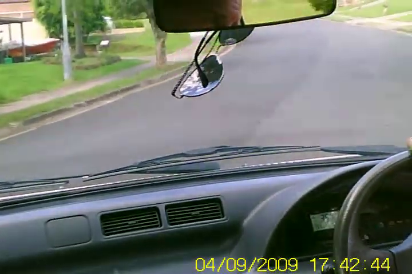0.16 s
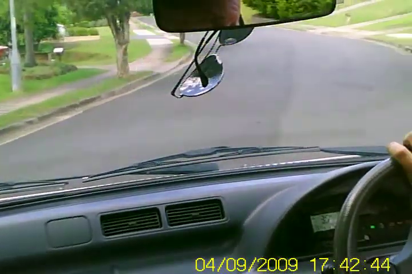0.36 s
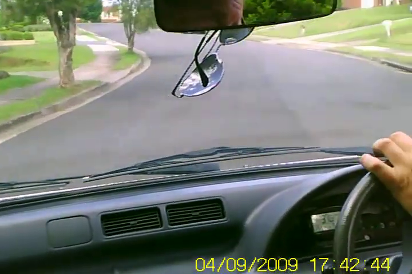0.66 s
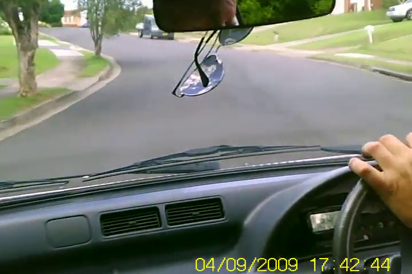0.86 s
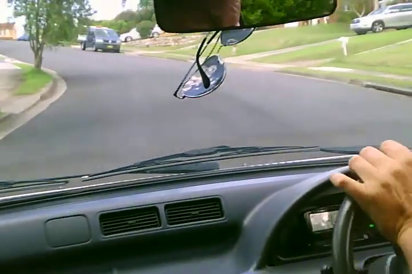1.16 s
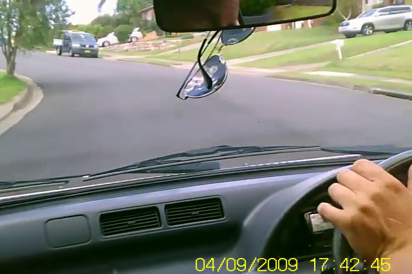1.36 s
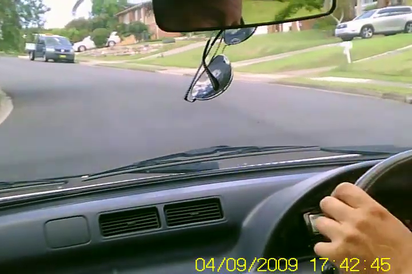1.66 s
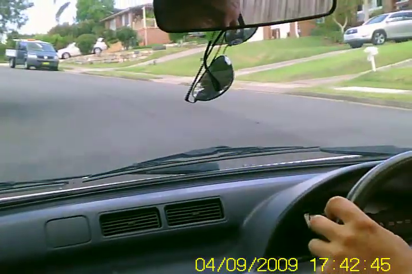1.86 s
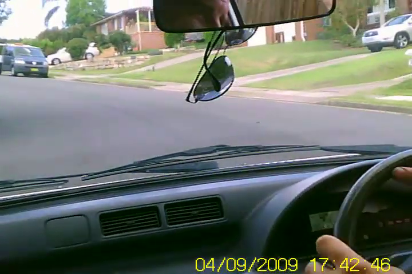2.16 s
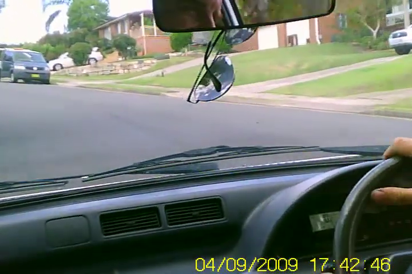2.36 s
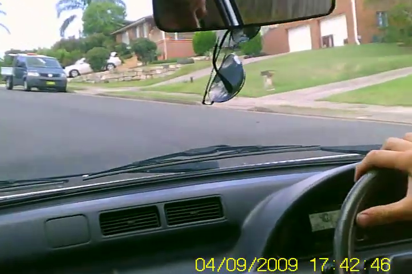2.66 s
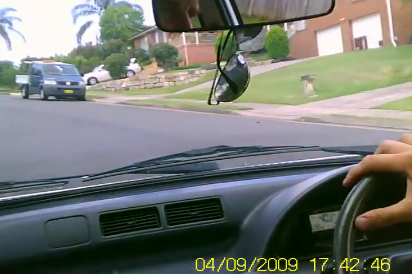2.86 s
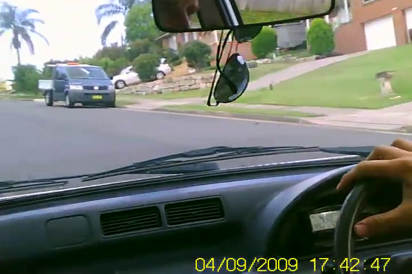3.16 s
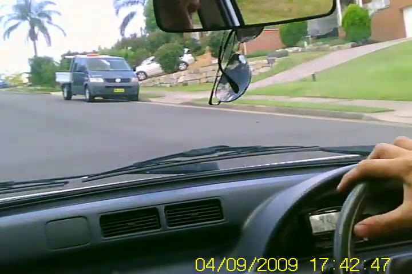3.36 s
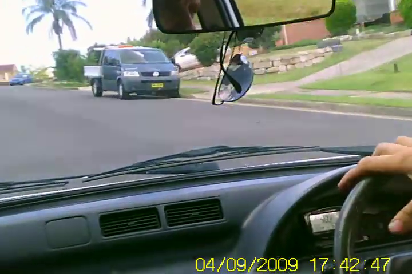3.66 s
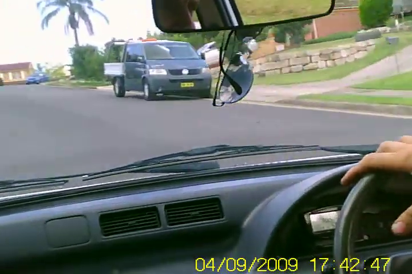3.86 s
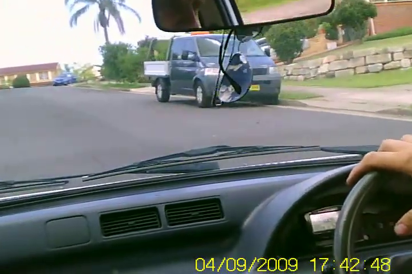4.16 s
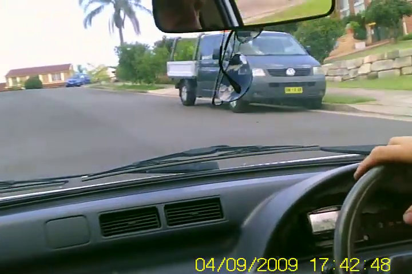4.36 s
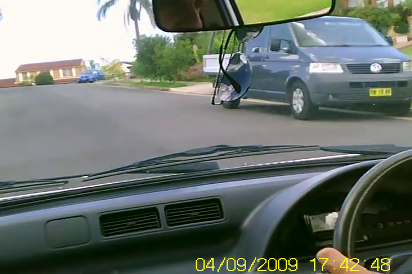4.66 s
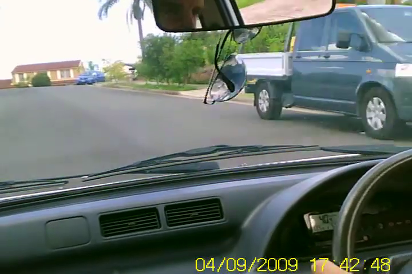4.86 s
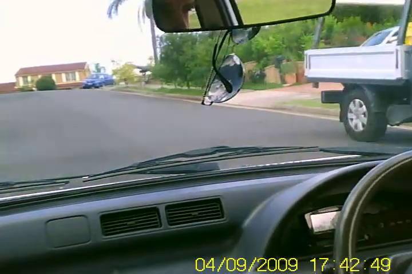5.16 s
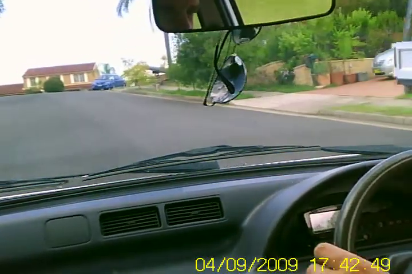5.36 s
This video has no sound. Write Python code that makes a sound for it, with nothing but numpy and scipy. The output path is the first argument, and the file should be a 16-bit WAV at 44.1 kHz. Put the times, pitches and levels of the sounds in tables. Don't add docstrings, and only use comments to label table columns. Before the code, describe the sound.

Inside a small electric car, a thin high motor whine rides over deep road rumble, with a few soft bumps and trim ticks.

```python
import sys
import numpy as np
from scipy import signal
from scipy.io import wavfile
from scipy.ndimage import uniform_filter1d

SR = 44100
rng = np.random.default_rng(int(sys.argv[2]) if len(sys.argv) > 2 else 0)


def gain_from_decibels(decibels):
    exponent = np.asarray(decibels, float) / 20
    return 10 ** exponent


def generate_wav(signal):
    frames = np.transpose(np.atleast_2d(signal))
    scaled = np.clip(frames, -1, 1) * 32767
    pcm = np.round(scaled).astype(np.int16)
    wavfile.write(sys.argv[1], SR, pcm)


N = 242550
TIME_S = np.arange(N) / SR


def rms_one(x):
    return x / np.sqrt(np.mean(x ** 2) + 1e-20)


def in_time(rows):
    s, *columns = np.transpose(rows)
    return [np.interp(TIME_S, s, column) for column in columns]


def drift(rate_hz):
    pole = np.exp(-80 * np.pi * rate_hz / SR)
    white = rng.standard_normal(N // 40 + 4002)
    slow = signal.lfilter([1], [1, -2 * pole, pole * pole], white)[4000:]
    return np.interp(np.arange(N) / 40, np.arange(len(slow)), rms_one(slow))


def resonance(x, hz, width_hz):
    r = np.exp(-np.pi * width_hz / SR)
    feedback = [1, -2 * r * np.cos(2 * np.pi * hz / SR), r * r]
    return signal.lfilter([(1 - r * r) / 2, 0, (r * r - 1) / 2], feedback, x)


def steep_resonance(x, hz, width_hz):
    return resonance(resonance(x, hz, width_hz), hz, width_hz)


def narrow_noise(hz, width_hz):
    white = rng.standard_normal(N + SR)
    return rms_one(steep_resonance(white, hz, width_hz)[SR:])


def tone(turns, flutter_db, rate_hz):
    sine = np.sqrt(2) * np.sin(2 * np.pi * (turns + rng.random()))
    return sine * gain_from_decibels(flutter_db * drift(rate_hz))


def rough_tone(turns, width_hz):
    angle = 2 * np.pi * turns
    return np.cos(angle) * drift(width_hz) + np.sin(angle) * drift(width_hz)


# start_s (centre of swell), level_db (above the idle boom)
HEAVES = [(.16, 6), (.5, 7), (.63, 7.5), (.87, 15.5), (1.07, 9), (1.3, 3.5), (1.45, 9), (2.03, 9),
          (2.2, 7.5), (2.7, 7.5), (3.1, 9), (3.36, 6.5), (3.64, 6), (3.95, 4.5), (4.2, 6.5), (4.46, 8),
          (4.7, 9), (4.95, 7), (5.15, 8), (5.48, 8)]


def humps_db():
    spread_s = 0.059
    return sum(lift_db * np.exp(-((TIME_S - s) / spread_s) ** 2 / 2) for s, lift_db in HEAVES)


# start_s, level_db (about the mean)
ROUGHNESS = [(0, 3), (.7, 1), (1.2, 1), (1.7, -3.5), (2.1, -1), (2.45, -3), (3.0, 1.6), (4.0, 0.8),
             (4.6, 1.5), (5.5, -4)]
# start_s, peak_db, pitch_hz, t60_s
HARDEST_JOINT = (.8225, -10.3, 20, .62)


def boom():
    heave = narrow_noise(21.23, 11.4)
    heave += gain_from_decibels(-5.0) * narrow_noise(29.05, 11.4)
    heave += gain_from_decibels(-8.0) * narrow_noise(42.65, 16)
    swing = uniform_filter1d(np.abs(signal.hilbert(heave)), size=1500)
    even_heave = rms_one(heave / swing ** .45)
    override = np.interp(TIME_S - HARDEST_JOINT[0], [-.02, .02, .12, .18], [1, .08, .08, 1])
    level_db = -29 + in_time(ROUGHNESS)[0] + humps_db()
    return gain_from_decibels(level_db) * override * even_heave


# pitch_hz, level_db (per Hz)
TYRE_SPECTRUM = [(29, -30), (50, -4.5), (91, -9.5), (144, -14.5), (200, -15.5), (356, -24), (517, -25),
                 (705, -37), (1110, -25), (1210, -59), (1280, -40), (1900, -38.5), (4440, -61), (5030, -45),
                 (7000, -86.5), (9100, -93), (15400, -120)]
# pitch_hz, width_hz, level_db (rms)
PANEL_MODES = [(132.1, 25.5, -44), (414, 35.5, -53.5), (526.5, 47, -55.5), (760.4, 26, -68.5),
               (1013, 40, -66), (1900, 97, -72.5), (3590, 50, -81.5), (4050, 88, -79.5), (5260, 120, -80),
               (5604, 52, -79.5), (5030, 1060, -72)]


def road(patchy_db):
    rough_db = in_time(ROUGHNESS)[0]
    finer_db = 0.45 * TIME_S
    rumble_db = -0.28 + 0.26 * rough_db
    body_db = 1.67 + .3 * rough_db - finer_db
    hiss_db = 3 + 0.29 * rough_db - finer_db
    spectrum_hz, spectrum_db = np.transpose(TYRE_SPECTRUM)
    edges_hz = 50 * 2 ** (np.arange(23) / 3)
    white = rng.standard_normal((2, N + 4000))
    together = drift(11.6)
    tyres = 0
    for k, (low, high) in enumerate(zip(edges_hz, edges_hz[1:])):
        band_filter = signal.butter(2, [low, high], "band", fs=SR, output="sos")
        band = signal.sosfilt(band_filter, white[k % 2])[4000:]
        level_db = np.interp(np.log(low * high) / 2, np.log(spectrum_hz), spectrum_db)
        surface_db = rumble_db if k < 8 else body_db if k < 14 else hiss_db
        flicker_db = patchy_db * (0.86 * together + drift(22.0))
        tyres = tyres + band * gain_from_decibels(level_db + surface_db + flicker_db)
    panels = sum(gain_from_decibels(level_db) * narrow_noise(hz, width_hz) for hz, width_hz, level_db in PANEL_MODES)
    return gain_from_decibels(-40.5) * rms_one(tyres) + gain_from_decibels(body_db) * panels


# steps from the mesh (shaft turns), level_db
SIDE_LINES = [(-2, -11), (-1, -5), (1, -9)]
SHAFT_SHARE = .0118


def mesh_whine(mesh_hz, uneven_db, loaded):
    turns = np.cumsum(mesh_hz + 2.0 * drift(6.0)) / SR
    depth = np.clip(.9 * loaded * gain_from_decibels(uneven_db), 0, 1)
    throb = 1 + depth * np.cos(2 * np.pi * (SHAFT_SHARE * turns + 0.36))
    out = throb * tone(turns, flutter_db=1.5, rate_hz=4.0)
    power = 1 + depth ** 2 / 2
    for step, level_db in SIDE_LINES:
        gain = gain_from_decibels(level_db + uneven_db)
        out = out + gain * rough_tone((1 + step * SHAFT_SHARE) * turns, 4.0)
        power = power + gain ** 2
    return out / np.sqrt(power)


# start_s, pitch_hz
MESH_PITCH = [(0, 1110), (.3, 1133), (.7, 1172), (1.2, 1190), (1.7, 1208), (2.2, 1228), (2.6, 1221),
              (3, 1221), (3.5, 1214), (4, 1210), (4.41, 1203), (4.5, 1174), (5, 1163), (5.5, 1145)]
# start_s, level_db (whine), torque (0-1), uneven_db (contact)
DRIVE_LINE = [(0, -53, 0, -2), (.3, -53.5, .25, -3), (.6, -62.5, .05, -5), (.9, -55.5, .05, 4),
              (1.2, -54.5, 0.4, -1), (1.5, -48, 0.38, 1.5), (1.9, -52.5, 0.6, 3), (2.3, -55.5, 0.63, -5.5),
              (2.8, -51, 1, 1), (3.1, -52, 0.92, -1), (3.4, -49, 0.88, -7), (3.65, -51, 0.82, -0.5),
              (4.0, -48.5, .7, -4), (4.4, -47, .6, -8), (4.435, -58.5, 0.1, 2), (4.75, -54, .15, 5),
              (5.1, -52.5, 0.44, -5), (5.5, -51, 0.6, -10)]
# level_db (no torque), gained_db (per unit torque)
RATTLE_DB = (-58, -38)
THIRD_DB = (-85, 15.4)
FOURTH_DB = (-89, 21)
# order (multiple of mesh), level_db (rms), width_hz
GEAR_ORDERS = [(.385, -57, 2.6), (1.5, -79.5, 10)]


def gearbox():
    mesh_hz, = in_time(MESH_PITCH)
    whine_db, torque, uneven_db = in_time(DRIVE_LINE)
    swing_db = whine_db + 51.5
    loaded = np.maximum(torque - 0.29, 0)
    rattle_db = RATTLE_DB[0] + RATTLE_DB[1] * loaded
    third_db = THIRD_DB[0] + THIRD_DB[1] * torque
    fourth_db = FOURTH_DB[0] + FOURTH_DB[1] * torque + 0.33 * (mesh_hz - 1210)
    housing_db = -70.5 + 0.4 * np.minimum(swing_db, 0) + 2 * loaded
    half_db = -55.5 + .4 * swing_db - .25 * np.abs(mesh_hz / 2 - 565)
    turns = np.cumsum(mesh_hz) / SR
    out = gain_from_decibels(whine_db) * mesh_whine(mesh_hz, uneven_db, loaded)
    out += gain_from_decibels(rattle_db) * rough_tone(1.031 * turns, 6.0)
    out += gain_from_decibels(half_db) * tone(turns / 2, flutter_db=3.0, rate_hz=8.0)
    out += gain_from_decibels(third_db) * rough_tone(2.995 * turns, 30.0)
    out += gain_from_decibels(fourth_db) * rough_tone(4 * turns, 36.0)
    for order, level_db, width_hz in GEAR_ORDERS:
        out += gain_from_decibels(level_db) * rough_tone(order * turns, width_hz)
    return out + gain_from_decibels(housing_db) * narrow_noise(5035, 95)


# pitch_hz, level_db
BUZZ_LINES = [(3894, -87), (5600, -86), (6200, -95), (7400, -87), (9600, -88)]


def converter_buzz():
    return sum(gain_from_decibels(level_db) * tone(hz * TIME_S, flutter_db=-2.5, rate_hz=3.0) for hz, level_db in BUZZ_LINES)


# start_s, peak_db, pitch_hz, t60_s
JOINTS = [
    (.731, -23, 120, 0.044),
    (.732, -25.5, 161, 0.044),
    (4.393, -19.5, 125, 0.052),
    (4.394, -28, 238, 0.028),
    (0.1, -36, 69, 0.033),
]


def thumps():
    out, age = np.zeros(N), np.arange(SR) / SR
    for s, peak_db, hz, t60 in [*JOINTS, HARDEST_JOINT]:
        swell = (1 - np.exp(-1.5 * age * hz)) * gain_from_decibels(-60 * age / t60)
        ring = swell / swell.max() * np.sin(2 * np.pi * hz * age)
        out[round(s * SR):][:SR] -= gain_from_decibels(peak_db) * ring
    return out


# start_s, level_db (rms), pitch_hz (centre), width_hz, decay_s
TRIM_BURSTS = [(0.47, -57, 2600, 1800, 0.015), (.428, -53.5, 3000, 1800, 0.015),
               (.543, -50, 1920, 300, 0.02), (1.121, -50, 1900, 500, .012), (1.137, -56, 5800, 2300, 0.015),
               (1.139, -50, 1800, 2000, .025), (1.161, -46.5, 2500, 1900, 0.019),
               (1.178, -44.5, 1350, 1800, 0.021), (1.212, -64, 1800, 2500, 0.013),
               (1.163, -52, 6100, 820, 0.011), (1.161, -68, 7500, 4000, 0.025),
               (1.263, -69, 1800, 1200, .015), (1.404, -52, 1930, 360, .02), (4.412, -47, 2130, 400, 0.018),
               (1.165, -43.5, 700, 960, 0.04), (.735, -39, 240, 320, 0.068), (2.8, -47.5, 330, 300, .04)]


def rustles():
    out, age = np.zeros(N), np.arange(8000) / SR
    for s, level_db, hz, width_hz, decay_s in TRIM_BURSTS:
        grains = rng.standard_normal(8000) * gain_from_decibels(3.0 * rng.standard_normal(8000))
        shape = (1 - np.exp(-age / 0.0021)) * np.exp(-age / decay_s)
        burst = shape * rms_one(steep_resonance(grains, hz, width_hz))
        out[round(s * SR):][:8000] += gain_from_decibels(level_db) * burst
    return out


def gain_db():
    duck_s, duck_db, recover_s, settled_db = .916, -6.5, .95, -1.2
    since = TIME_S - duck_s
    recovery = np.exp(-np.maximum(since, 0) / recover_s)
    return (since > 0) * (settled_db + (duck_db - settled_db) * recovery)


def scene():
    return (boom() + road(patchy_db=1.0) + gearbox() + thumps() + rustles())[None]


def roll_off(x):
    return signal.sosfilt(signal.butter(12, 12030, fs=SR, output="sos"), x)


def record(dry):
    preamp_hiss, converter_hiss = rng.standard_normal((2, N))
    x = gain_from_decibels(gain_db()) * (dry - .035 + gain_from_decibels(-67) * preamp_hiss)
    x = x + gain_from_decibels(-74.5) * converter_hiss + converter_buzz()
    top_cut = signal.butter(8, 10150, fs=SR, output="sos")
    settled = signal.sosfilt_zi(top_cut)[:, None] * x[0, 0]
    mix, _ = signal.sosfilt(top_cut, x, zi=settled)
    return roll_off(mix)


dry = scene()
out = record(dry)
generate_wav(out)
```